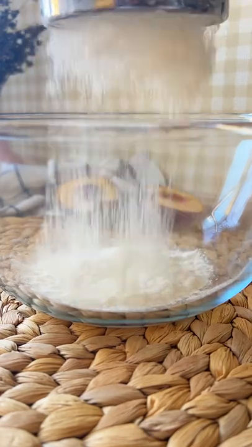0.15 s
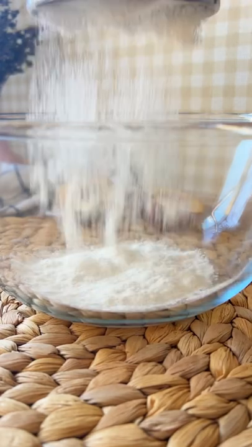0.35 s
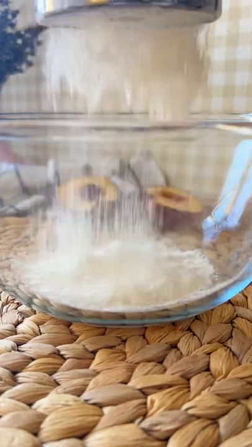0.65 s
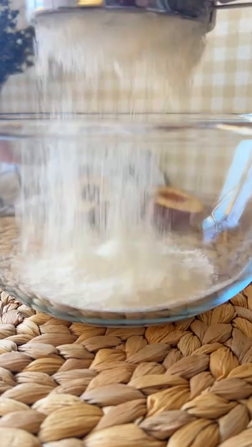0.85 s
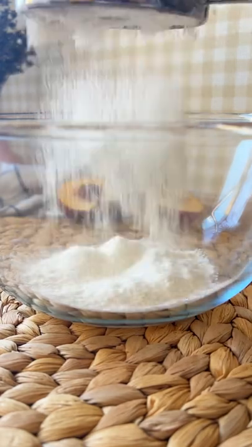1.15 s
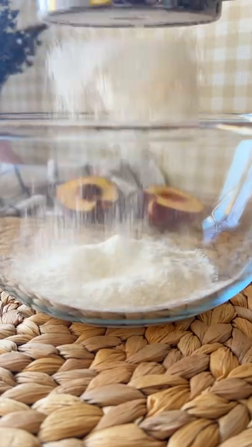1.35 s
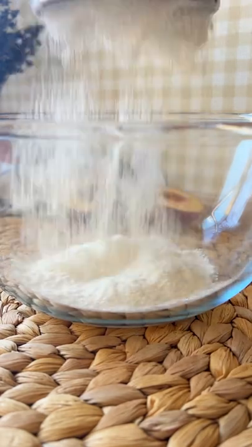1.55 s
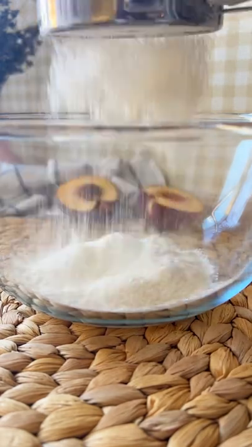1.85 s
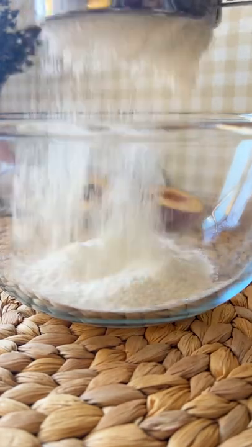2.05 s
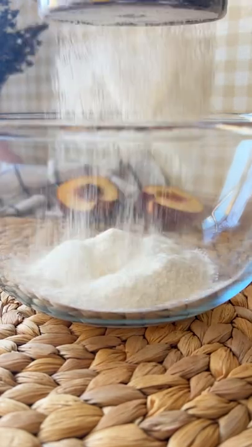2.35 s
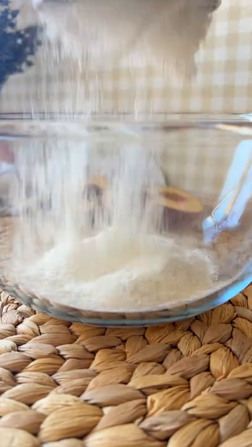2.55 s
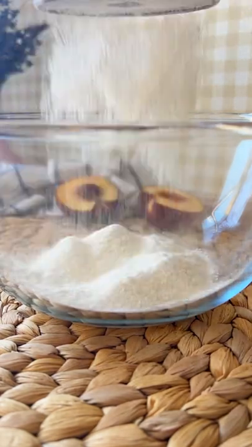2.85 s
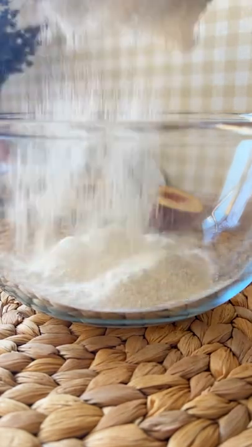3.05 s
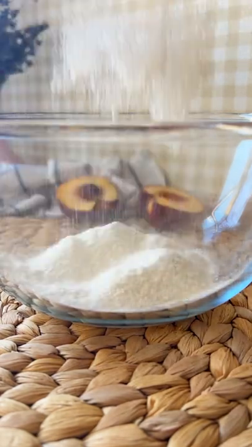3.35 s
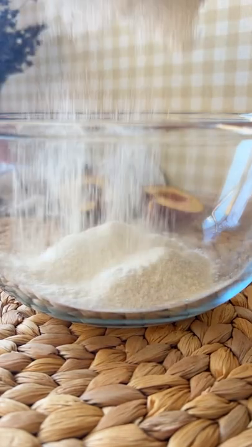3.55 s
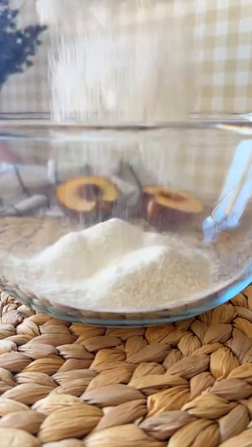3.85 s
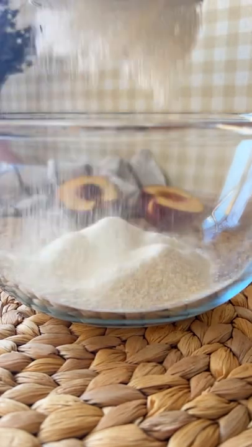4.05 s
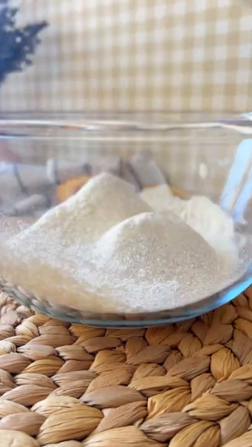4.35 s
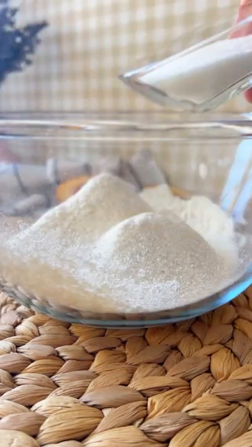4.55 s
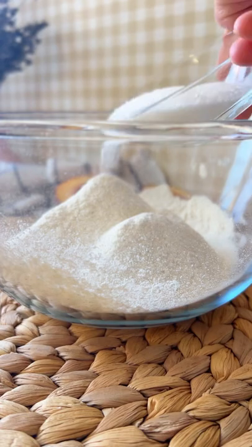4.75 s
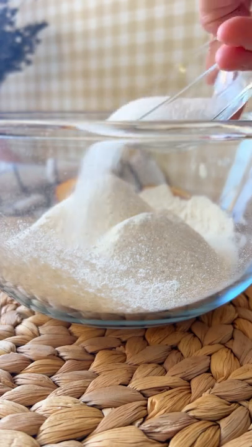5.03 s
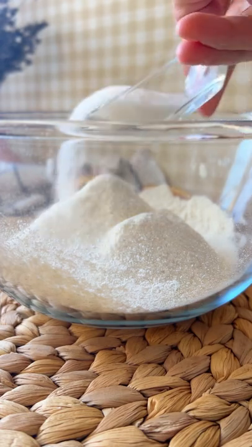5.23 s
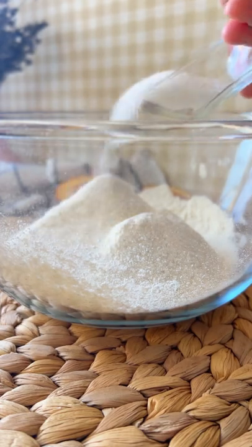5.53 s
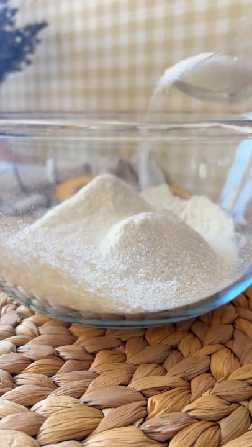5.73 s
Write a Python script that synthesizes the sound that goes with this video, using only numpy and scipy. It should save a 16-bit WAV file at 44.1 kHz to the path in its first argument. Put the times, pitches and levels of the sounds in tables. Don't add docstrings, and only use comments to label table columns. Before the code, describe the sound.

A hand-cranked metal flour sifter rasps and clacks in quick even strokes, cuts off abruptly, then sugar trickles faintly onto glass.

```python
import sys
import numpy as np
from scipy import signal
from scipy.fft import rfft, irfft, next_fast_len
from scipy.io import wavfile
from scipy.ndimage import uniform_filter1d, minimum_filter1d

SR = 44100
rng = np.random.default_rng(int(sys.argv[2]) if len(sys.argv) > 2 else 0)


def to_wav(sig):
    pcm = np.clip(np.atleast_2d(sig), -1, 1) * 32767
    pcm = np.round(pcm).astype(np.int16)
    wavfile.write(sys.argv[1], SR, pcm.T)


def voltage_ratio(decibels):
    exponent = np.asarray(decibels, float) / 20
    return 10 ** exponent


N = 259616
T = np.arange(N) / SR
HZ = np.fft.rfftfreq(next_fast_len(N + SR // 2), 1 / SR)

# centre in Hz, width in Hz, level in dB.
CAN_MODES = [(483, 76, 7), (1107, 120, 12), (1890, 200, 10), (2573, 113, 12.5), (3246, 190, 10.5),
             (4673, 130, 2.5), (4737, 220, 8), (5570, 760, 3.5), (5840, 410, 4.5), (8300, 210, 3),
             (8960, 650, 3), (9300, 470, 2)]
# start in seconds, level in dB, low modes in dB, high modes in dB,
# rise in ms.
LEVER_STOPS = [(0.1064, -21.5, -5, 2.5, 0.32), (0.356, -29, 0, 4.5, 0.42), (0.5997, -24.5, -0.5, 4, 0.4),
               (1.2876, -31, -1, -1.5, 0.34), (1.658, -26.5, -1, -2, 0.35),
               (1.9196, -33.5, -2.5, -4.5, 0.36), (2.6342, -21, -7, -1.5, 1.38), (2.921, -35, -4, -1, 0.38),
               (3.123, -24.5, -5, -0.5, 0.4), (3.6357, -30.5, -4.5, -3, 0.44),
               (3.8585, -23.5, -2.5, 1.5, 0.46), (4.1, -35, -5.5, -1.5, 0.34), (4.119, -27, -1, 5, 0.38)]
SLACK_CLICKS = [(0.279, -47, -12, 6.2, 0.31), (0.724, -56, 1, 4, 0.22), (0.9755, -53, 4, 3.5, 0.29),
                (1.2112, -49.5, -2, 2.8, 0.39), (1.261, -58, -5.5, 4.5, 0.33),
                (1.4589, -41.5, -4.5, 5.8, 0.25), (1.7237, -37, -10, 4.3, 0.26),
                (1.9587, -36.5, -4.5, 3.6, 0.33), (2.2072, -39.5, -2.5, 3.3, 0.31),
                (2.6982, -35, -6, 2.4, 0.3), (2.9591, -40, -3.5, 4.4, 0.35), (3.0721, -37, -2, 5.6, 0.35),
                (3.2075, -35, -6, 4, 0.3), (3.444, -37.5, -5.5, 6, 0.31), (3.4758, -43.5, -8, 4.7, 0.28),
                (3.688, -40.5, -6, 4, 0.22), (3.9384, -37, -6, 4.8, 0.37), (4.1826, -37.5, -7, 5, 0.27)]
JOINT_TOCKS = [(0.751, -57.5, 13.5, 4, 0.4), (0.8584, -54.5, 13.5, 4.7, 0.4), (1.103, -55, 13.5, 2.9, 0.42),
               (1.339, -54, 13.5, 4.6, 0.35), (1.848, -56.5, 13.5, 3.6, 0.4),
               (2.0803, -57, 13.5, 4.5, 0.37), (2.4552, -65.5, 13.5, 4, 0.4), (2.5733, -60, 20, 1.1, 0.4),
               (2.8384, -60.5, 18, 1.5, 0.4), (4.0702, -52, 13.5, 4, 0.4)]


def unit(x):
    return x / np.sqrt(np.mean(x ** 2) + 1e-20)


def at_hz(points, hz=HZ):
    table_hz, values = np.array(points).T
    return np.interp(np.log(hz + 1), np.log(table_hz + 1), values)


def over_time(points):
    s, values = np.transpose(points)
    return np.interp(T, s, values)


def filtered(x, response):
    size = 2 * (len(HZ) - 1)
    return irfft(rfft(x, size) * response, size)[..., :N]


def above(hz, order):
    return 1 / (1 + (hz / (HZ + 1)) ** order)


def causal(db):
    cepstrum = irfft(db * np.log(10) / 20)
    cepstrum[len(HZ):] = 0
    cepstrum[1:len(HZ) - 1] *= 2
    return np.exp(rfft(cepstrum))


def bumps(peaks):
    return sum(db / (1 + (2 * (HZ - hz) / width) ** 2) for hz, width, db in peaks)


def drift(rate_hz):
    r = np.exp(-2 * np.pi * rate_hz / SR)
    return unit(signal.lfilter([1], [1, -2 * r, r * r], rng.standard_normal(N + SR))[SR:])


def grains(per_s, spread_db, channels=1):
    shape = (channels, N)
    sizes = voltage_ratio(spread_db * np.minimum(rng.exponential(1, shape), 5)) * rng.choice([-1, 1], shape)
    return unit(sizes * (rng.random(shape) < per_s / SR))


def ring(clicks, hz, t60_s):
    r, w = voltage_ratio(-60 / (t60_s * SR)), 2 * np.pi * hz / SR
    return signal.lfilter([0, np.sin(w)], [1, -2 * r * np.cos(w), r * r], clicks + 1e-18)


def patchy(x, depth_db, size=256):
    z = signal.stft(x, nperseg=size)[2]
    chance = uniform_filter1d(rng.standard_normal(z.shape[-2:]), size=4, axis=0)
    chance = uniform_filter1d(chance, size=8, axis=1)
    return signal.istft(z * voltage_ratio(depth_db * unit(chance)), nperseg=size)[1][..., :N]


def sweep_force():
    # start in seconds, length in ms, bite in dB, end in dB,
    # treble in dB.
    pull_rows = [(0.061, 36, -40, -36, -7.5), (0.301, 53, -44.5, -44.5, -3.5),
                 (0.553, 31, -41.5, -39.5, -4.5), (0.873, 17, -42, -42.5, 0), (1.119, 21, -45.5, -48.5, 1),
                 (1.356, 28.5, -47.5, -48, 1), (1.607, 41, -39.5, -48, 0), (1.864, 21, -44, -43.5, 1),
                 (2.097, 26, -47, -45, 0), (2.349, 16, -42.5, -43, -2.5), (2.585, 69, -41.5, -52, -3.5),
                 (2.853, 23, -45, -41.5, -1.5), (3.081, 28, -45.5, -45, 3), (3.338, 42, -42.5, -54, -0.5),
                 (3.583, 32, -45, -46, -2.5), (3.811, 46, -42.5, -48, 1), (4.072, 36, -44, -45, -2),
                 (4.313, 23, -46, -48, -4.5)]
    return_rows = [(-0.04, 71, -42.5, -60, -5.5), (0.175, 28, -46.5, -43.5, -1),
                   (0.414, 35, -44.5, -47, -1.5), (0.624, 43.5, -56.5, -41.5, -2.5),
                   (0.778, 19.3, -44.5, -42.5, -1.5), (0.998, 27, -40, -42, -5),
                   (1.232, 15.4, -49, -38, -5), (1.48, 15.7, -42, -44, -1.5),
                   (1.749, 15, -37.5, -41.5, -3.5), (1.983, 20, -40.5, -41.5, -0.5),
                   (2.238, 21, -39, -45.5, -6.5), (2.467, 31, -47, -41.5, -5), (2.723, 32, -41.5, -43, -4),
                   (2.987, 11, -41.5, -42, -5.5), (3.234, 12.3, -39, -41, -2.5),
                   (3.468, 10.6, -45.5, -39.5, -2), (3.718, 16, -42.5, -40.5, -4),
                   (3.960, 22, -41, -44.5, -2.5), (4.202, 26, -46.5, -41.5, -1.5)]
    rise_db, fall_db_per_s = 22, 520
    power, bright = np.zeros(N), np.zeros(N)
    for rows, rise_ms in ((pull_rows, 13), (return_rows, 14.5)):
        for s, length_ms, bite_db, end_db, treble_db in rows:
            times = s + np.cumsum([0, rise_ms / 1000, length_ms / 1000, .2])
            levels = [bite_db - rise_db, bite_db, end_db, end_db - .2 * fall_db_per_s]
            gain = voltage_ratio(np.interp(T, times, levels, left=-150))
            power += gain ** 2
            bright += (gain * voltage_ratio(treble_db + 2.0)) ** 2
    return np.sqrt(power), np.sqrt(bright)


def rasp(force, bright):
    # frequency in Hz, level in dB per Hz.
    rasp_tone = [(350, -36), (600, -6), (1420, -13), (1820, -4), (2240, -10), (3040, -6), (5010, -8.5),
                 (5910, -3.5), (8960, -5), (15200, -17), (16500, -27)]
    # centre in Hz, width in Hz, level in dB.
    mesh_modes = [(1183, 130, 8.5), (1820, 210, 2), (1960, 650, 7), (2476, 120, 9.5), (3030, 290, 8.5),
                  (3770, 230, 6.5), (4620, 570, 5), (4664, 70, 5.5), (5535, 140, 6), (6230, 300, 4.5),
                  (8950, 180, 5.5), (9500, 63, 6), (9450, 200, 1.5)]
    near = grains(6500, spread_db=2.8)[0]
    spread = grains(9000, spread_db=0.5, channels=2)
    near = unit(near + voltage_ratio(-9) * grains(700, spread_db=4.0)[0])
    tone = causal(at_hz(rasp_tone) + bumps(mesh_modes))
    scale = np.sqrt(np.mean(np.abs(tone) ** 2))
    upper = above(6500, 6)
    clumps = voltage_ratio(1.9 * drift(210) + 0.5 * drift(44))

    def coloured(x):
        body = filtered(x * force * clumps, tone * (1 - upper))
        return body + filtered(x * bright * clumps, tone * upper)

    near = patchy(coloured(near), depth_db=2.5)
    spread = filtered(patchy(coloured(spread), depth_db=-2.0), above(1300, 3))
    return voltage_ratio(2.0) * near / scale, voltage_ratio(-3.5) * spread / scale


def knock(contact, db, rise_ms, note_hz, note_db, snap_ms, strike_db):
    bounce_ms, bounce_db, tail_ms, tail_db = 3.9, -9, 3.2, -17
    strike_ms, crack_ms, crack_db, note_t60_s = 0.018, 0.19, -4, 0.0069
    late, soft, detune = rng.random(3)
    ms = np.arange(contact.shape[1]) * 1000 / SR
    since_ms = ms - bounce_ms * (0.57 + 0.52 * late)
    bounce = voltage_ratio(bounce_db - 10.0 * soft - 1.2 * (db + 42.5))
    bounce = bounce * np.exp(-np.abs(since_ms) / snap_ms) * (since_ms > -.5)
    decay = np.exp(-ms / snap_ms) + bounce + voltage_ratio(tail_db) * np.exp(-ms / tail_ms)
    shape = (1 - np.exp(-ms / max(rise_ms, .05))) * decay
    crack = np.exp(-((ms - .6) / crack_ms) ** 2) * contact
    crack = np.diff(crack, n=2, prepend=np.zeros((2, 2)))
    strike = voltage_ratio(strike_db) * np.exp(-((ms - .3 - rise_ms) / strike_ms) ** 2)
    burst = shape * contact - strike * [[1], [0]] + voltage_ratio(crack_db) * crack
    burst = burst + voltage_ratio(note_db - 26.5) * ring(burst, note_hz * (0.951 + 0.14 * detune), note_t60_s)
    return burst * voltage_ratio(db + 7.5) / np.sqrt(np.sum(burst[0] ** 2) / (0.0072 * SR))


def knocks():
    padded_stops = [(0.479, -29.5, -1.8, -6, 0.5), (0.9297, -34, -0.93, -19, 0.46),
                    (1.058, -34.5, -0.9, -18, 0.36), (1.489, -45, -1.2, -8, 0.36),
                    (1.5934, -35, -1, -13, 0.35), (3.3897, -32.5, -1.4, -7, 0.38)]
    wire_flicks = [(0.0958, -49.5, 5, 12, 0.44), (0.211, -52.5, 4.4, 14, 0.33), (0.438, -50, 5.9, 14, 0.37),
                   (0.678, -42, 5, 11.7, 0.43), (1.3818, -53, 5, 16.4, 0.46), (2.137, -47.5, 4.2, 11, 0.59),
                   (2.332, -54.5, 11, 9.6, 0.66), (2.349, -51, 6.1, 7.3, 0.4),
                   (2.3649, -47.5, 4.3, 11, 0.44), (2.4465, -45.5, 3.5, 12.5, 0.51),
                   (3.3244, -43, 7.3, 7.7, 0.4), (3.576, -59, 7.8, 9.3, 0.4)]
    # left-right in dB, wire note in Hz, note in dB, snap in ms,
    # first strike in dB.
    kind_colours = [
        (1.5, 10000, -1.5, 1.9, 7),
        (1.5, 4200, 2, 2.4, 4),
        (0.8, 7990, 9.5, 1.4, 8.5),
        (1.2, 11000, 1.5, 2.3, 4.5),
        (-1.5, 8300, 1, 2.2, 3),
    ]
    # start in seconds, level in dB.
    thread_catches = [(0.3157, -58.5), (0.5666, -48), (0.888, -46), (1.0031, -54), (1.2426, -51),
                      (1.376, -56), (1.6182, -57), (1.7603, -48), (1.8824, -44), (1.9963, -48),
                      (2.104, -53), (2.2478, -50), (2.588, -53), (2.7322, -49), (2.858, -52), (2.9952, -56),
                      (3.2455, -54), (3.3458, -47), (3.592, -46), (3.732, -51), (3.823, -51), (4.0834, -45),
                      (4.2133, -49.5)]
    # low modes in dB, high modes in dB, rise in ms, left-right in dB, wire note in Hz,
    # note in dB, snap in ms, first strike in dB.
    catch_colour = (2.5, 5, -0.2, 3, 8998.5, -0.5, 0.5, 2.5)
    # frequency in Hz, level in dB per Hz.
    knock_tone = [(180, -46), (300, -10.5), (1900, -10), (3000, -13.5), (4700, -1.5), (6200, -8.5),
                  (6900, -6.5), (8000, -6), (9400, -2.5), (11800, -11.5), (13700, -11), (16000, -16.5),
                  (17000, -41.5)]
    kinds = (LEVER_STOPS, padded_stops, SLACK_CLICKS, wire_flicks, JOINT_TOCKS)
    rows = [row + colour for kind, colour in zip(kinds, kind_colours) for row in kind]
    rows += [row + catch_colour for row in thread_catches]
    contact = grains(16000, spread_db=1.5, channels=2)
    groups = np.zeros((3, 2, N))
    apart = voltage_ratio(-7) * np.outer([1, 1, 0], [1, -1])[..., None]
    for s, db, low_db, high_db, rise_ms, pan_db, *colour in rows:
        start = int(s * SR) - 12
        at = slice(start, start + SR // 25)
        burst = knock(contact[:, at], db, rise_ms, *colour)
        gains = voltage_ratio(np.add.outer([low_db + 0.5, 0, high_db], [pan_db / 4, -pan_db / 4]))
        groups[:, :, at] += gains[..., None] * (burst[0] + apart * burst[1])
    tone = causal(at_hz(knock_tone) + bumps(CAN_MODES))
    low, high = 1 / (1 + (HZ / 2300) ** 4), above(6500, 6)
    return sum(filtered(g, tone * part) for g, part in zip(groups, (low, 1 - low - high, high)))


def cavity(force):
    # time in seconds, level in dB.
    flour_levels = [(0.0, -62.5), (0.3, -60.5), (0.6, -61.5), (0.9, -58.5), (1.15, -55.5), (1.45, -54.5),
                    (1.75, -54), (2.05, -55), (2.3, -55.5), (2.6, -55.5), (2.85, -57), (3.1, -57),
                    (3.35, -58), (3.6, -60.5), (3.85, -58), (4.15, -59.5), (4.34, -61.5)]
    # frequency in Hz, level in dB per Hz.
    cavity_tone = [(60, -25), (135, -1), (190, -11), (310, -2), (410, 1), (510, -1.5), (650, -14),
                   (900, -13), (1500, -34.5)]
    follow = signal.lfilter([.005], [1, -.995], force / np.median(force)) ** 0.42
    noise = grains(3000, spread_db=2.2)[0] * follow * voltage_ratio(1.5 * drift(30))
    tone = causal(at_hz(cavity_tone) + bumps([(640, 39, 12)]))
    return voltage_ratio(over_time(flour_levels) + 4.0) * unit(filtered(noise, tone))


def lurches():
    thud_hz, t60_s, thud_db, follows = 261, 0.049, -45, 0.44
    out = np.zeros(N)
    for s, knock_db, *_ in JOINT_TOCKS + SLACK_CLICKS:
        detune, soft = rng.random(2)
        push_db = thud_db + follows * (knock_db + 44.5) - 9.9 * soft
        push = voltage_ratio(push_db) * (np.arange(SR // 8) == 0)
        start = int(s * SR)
        out[start:start + SR // 8] += ring(push, thud_hz * (.8 + 0.48 * detune), t60_s)
    return signal.lfilter([.04], [1, -.96], out)


def thumps():
    # start in seconds, level in dB, frequency in Hz, t60 in seconds.
    table_bumps = [
        (0.519, -41, 81, 0.34),
        (0.543, -47, 62.5, 0.11),
        (0.629, -48, 51.5, 0.24),
    ]
    out = np.zeros(N)
    for s, db, hz, t60_s in table_bumps:
        click = 1.0 * (np.arange(N) == int(s * SR))
        out += voltage_ratio(db) * ring(click, hz, t60_s)
    return uniform_filter1d(out, size=150)


def sugar():
    # time in seconds, level in dB.
    spurts = [(4.551, -75.5), (4.689, -81), (4.767, -75.5), (4.823, -72), (4.908, -68), (4.967, -74),
              (5.045, -71), (5.095, -76.5), (5.172, -77.5), (5.224, -74), (5.3, -79), (5.355, -78),
              (5.422, -73.5), (5.475, -72.5), (5.547, -73), (5.6, -78.5), (5.662, -83), (5.715, -83),
              (5.789, -83), (5.842, -81)]
    # centre in Hz, width in Hz, level in dB.
    glass_modes = [(1780, 240, -4.5), (2660, 140, 6), (5660, 290, 4), (6420, 710, -8.5), (9320, 560, -0.7),
                   (13850, 410, -12.5), (15500, 430, -25), (9590, 210, 1.5)]
    coarse_ms, fine_ms = 21.4, 24.4
    coarse = fine = voltage_ratio(-89.5) * np.clip((T - 4.48) / 0.037, 0, 1)
    for s, db in spurts:
        since_ms = (T - s) * 1000
        fine_db = -1 + 7 * (s - 5) - .7 * (db + 73.5)
        coarse = np.hypot(coarse, voltage_ratio(db) * np.exp(-(since_ms / coarse_ms) ** 2))
        fine = np.hypot(fine, voltage_ratio(db + fine_db) * np.exp(-np.abs(since_ms / fine_ms) ** 3))
    tone = 0
    for k, (hz, width_hz, db) in enumerate(glass_modes):
        tone = tone + voltage_ratio(db) * (-1) ** k / (1 + 1.3j * (HZ - hz) / width_hz) ** 2
    upper = above(7800, 8)
    scale = np.sqrt(np.mean(np.abs(tone * (1 - upper)) ** 2))
    patter = grains(6000, spread_db=3.5, channels=2)
    crystals = filtered(patter * coarse, tone * (1 - upper)) + filtered(patter * fine, tone * upper)
    return voltage_ratio(6.0) * crystals / scale


def stirring():
    # start in seconds, length in seconds, level in dB.
    hand_moves = [
        (4.389, 0.09, -82),
        (4.998, 0.12, -77.5),
        (5.314, 0.21, -81.5),
        (5.577, 0.23, -75.5),
    ]
    edge_ms, level = 32, voltage_ratio(-82.5)
    for s, length_s, db in hand_moves:
        inside_s = np.minimum(T - s, s + length_s - T)
        level = level + voltage_ratio(db) * np.clip(inside_s * 1000 / edge_ms + 1, 0, 1) ** 2
    return level * unit(filtered(rng.standard_normal(N), 1 / (1 + 2j * (HZ - 290) / 160)))


def ports(x):
    # frequency in Hz, left lead in radians.
    port_phase = [(60, 0.05), (300, 0.15), (600, 1.4), (860, 0.1), (1210, 1.1), (1460, -0.1), (2150, -0.9),
                  (2930, -1.4), (3790, 0.2), (5000, -2.0), (5600, -0.9), (8530, -1.3), (12700, -1.4),
                  (16000, -1.6)]
    # frequency in Hz, left-right in dB.
    port_balance = [(60, -0.5), (150, 0.5), (380, -3), (950, -1), (2380, 1), (5980, 1.0), (15000, -1.5)]
    half = voltage_ratio(at_hz(port_balance) / 2) * np.exp(.5j * at_hz(port_phase))
    return filtered(x * np.ones((2, 1)), np.array([half, 1 / half]))


def kitchen(x):
    # frequency in Hz, t60 in seconds.
    room_t60 = [(100, 1), (700, 0.66), (1400, 0.27), (3000, 0.35), (5500, 0.28), (7500, 0.11), (10000, 0.1),
                (16000, 0.03)]
    first_ms, alike_hz = 4, 700
    t, tail = np.arange(SR // 3) / SR, 0
    for low_hz in 80 * 2 ** np.arange(0, 8, .5):
        high_hz = min(np.sqrt(2) * low_hz, .45 * SR)
        band = signal.butter(2, [low_hz, high_hz], "band", fs=SR, output="sos")
        mid, side = rng.standard_normal((2, len(t)))
        unlike = 1 / (1 + (alike_hz / low_hz) ** 2)
        both = mid * np.sqrt(1 - unlike / 2) + side * np.sqrt(unlike / 2) * [[1], [-1]]
        tail = tail + signal.sosfilt(band, both) * voltage_ratio(-60 * t / at_hz(room_t60, 1.22 * low_hz))
    tail = tail * np.clip(t * 1000 / first_ms, 0, 1) ** 2
    tail = tail / np.sqrt(np.sum(tail ** 2) / 2)
    return signal.fftconvolve(x * np.ones((2, 1)), tail, axes=1)[:, :N]


def table_shake():
    shake_db, shake_ms, lag_ms = -37, 34, 7.1
    power = 0
    for s, db, *_ in LEVER_STOPS:
        since_ms = (T - s) * 1000 - lag_ms
        power = power + voltage_ratio(db + shake_db) ** 2 * np.exp(-2 * (since_ms / shake_ms) ** 2)
    return np.sqrt(power)


def air(first):
    # frequency in Hz, level in dB per Hz.
    hiss_tone = [(60, -41.5), (100, -13), (300, -19.5), (500, -19), (900, -19), (1600, -24), (4300, -23.5),
                 (5250, -37), (5700, -31), (8000, -32), (10200, -38), (12000, -44.5), (14000, -45.5),
                 (15700, -45)]
    # frequency in Hz, left-right likeness from -1 to 1.
    hiss_likeness = [(60, 0.44), (180, 0.93), (550, -0.99), (1650, 0.21), (4970, -0.22), (15000, 0.9)]
    # centre in Hz, width in Hz, level in dB.
    still_bands = [(900, 630, -5.5), (4700, 1600, -2)]
    # time in seconds, level in dB.
    rumble_levels = [(0.0, -74), (0.48, -61), (0.53, -46), (0.8, -60.5), (1.3, -63), (4.3, -66),
                     (4.45, -67.5), (4.93, -62), (5.6, -69)]
    # frequency in Hz, level in dB per Hz.
    rumble_tone = [(15, -40), (30, -16), (48, 1.5), (80, -3.5), (110, -12), (200, -39.5)]
    mid, side, low = rng.standard_normal((3, N))
    alike, tone = np.clip(at_hz(hiss_likeness), -.99, .99), voltage_ratio(at_hz(hiss_tone))
    hiss = filtered(mid, tone * np.sqrt(1 + alike))
    hiss = hiss + filtered(side, tone * np.sqrt(1 - alike)) * [[1], [-1]]
    hiss = first * hiss + (1 - first) * filtered(hiss, voltage_ratio(bumps(still_bands)))
    hiss = voltage_ratio(-70 + 13.25 * first) * unit(patchy(hiss, depth_db=4.0, size=1024))
    rumble = unit(filtered(low, voltage_ratio(at_hz(rumble_tone))))
    return hiss + np.hypot(voltage_ratio(over_time(rumble_levels) - 2.5), table_shake()) * rumble


def scene():
    # time in seconds, top treble in dB.
    treble_lift = [(0.0, 2), (0.75, 3), (1.0, 1.5), (2.4, 1.5), (2.6, 2), (4.3, 2)]
    force, bright = sweep_force()
    near, spread = rasp(force, bright)
    hits, hollow = knocks(), cavity(force)
    slumps = voltage_ratio(-14.0) * filtered(cavity(force), above(520, 6)) * [[1], [-1]]
    sifter = ports(near + hollow + lurches()) + slumps + spread + ports(hits) + thumps()
    sifter = sifter + (voltage_ratio(over_time(treble_lift)) - 1) * filtered(sifter, above(10500, 12))
    flat_hits = filtered(hits.mean(axis=0), causal(-1.25 * bumps(CAN_MODES)) * above(800, 4))
    room = voltage_ratio(-14.5) * kitchen(near + voltage_ratio(-1.5) * hollow)
    room = room + voltage_ratio(-13) * patchy(kitchen(flat_hits), depth_db=3.5)
    first = np.clip((4.3405 - T) / 0.004, 0, 1)
    return first * (sifter + room) + (1 - first) * (sugar() + stirring()) + air(first)


def drop_unheard(x):
    # frequency in Hz, quietest kept level in dB.
    quietest_kept = [(500, -115), (4500, -107), (5000, -98.5), (5400, -100), (5900, -106), (7300, -103.5),
                     (9500, -110), (10300, -103), (11500, -106), (12500, -109), (15600, -107), (16000, -66),
                     (17000, -63)]
    # frequency in Hz, limit in dB relative to the whole sound.
    masked_limit = [(500, -75), (4000, -59.5), (5200, -46), (6000, -52), (7000, -45), (10000, -58),
                    (11200, -44), (12300, -37), (13500, -39), (15500, -39)]
    size, count, doubt_db = 512, 3, 4.5
    hz, _, z = signal.stft(x, SR, nperseg=size)
    power = np.add.reduceat(np.abs(z) ** 2, np.arange(0, len(hz), count), axis=1)
    level = 10 * np.log10(uniform_filter1d(power / count, size=3, axis=2) + 1e-20)
    whole = 10 * np.log10(power.sum(axis=(0, 1)) / 2 + 1e-20)
    ahead = -minimum_filter1d(-whole, size=3, origin=-1)
    centre_hz = hz[::count, None] + 100
    doubt = uniform_filter1d(rng.standard_normal(level.shape[1:]), size=17, axis=1)
    limit = np.maximum(at_hz(quietest_kept, centre_hz), ahead + at_hz(masked_limit, centre_hz))
    limit = limit + doubt_db * unit(doubt)
    keep = np.clip(level.mean(axis=0) - limit + .5, .01, 1)
    return signal.istft(z * np.repeat(keep, count, axis=0)[:len(hz)], SR, nperseg=size)[1][:, :N]


def top_cut(x):
    return signal.sosfilt(signal.butter(12, 16970, fs=SR, output="sos"), x)


def record(dry):
    thinned = drop_unheard(dry)
    return top_cut(thinned)


dry = scene()
out = record(dry)
to_wav(out)
```